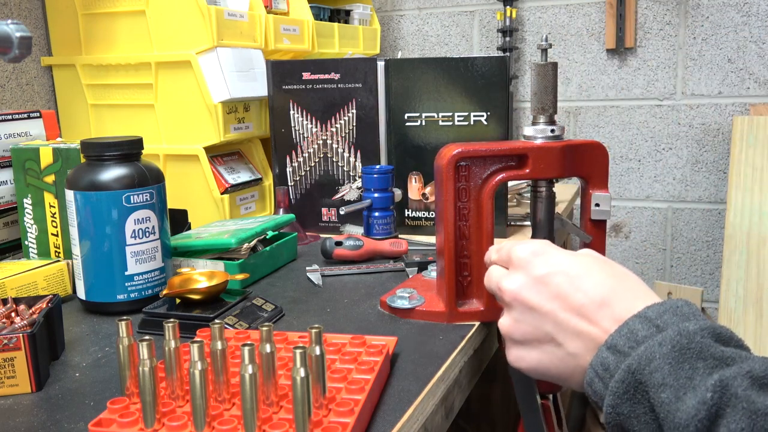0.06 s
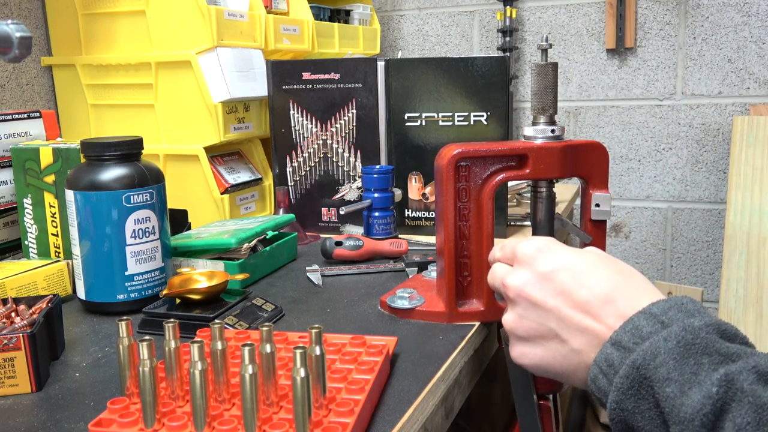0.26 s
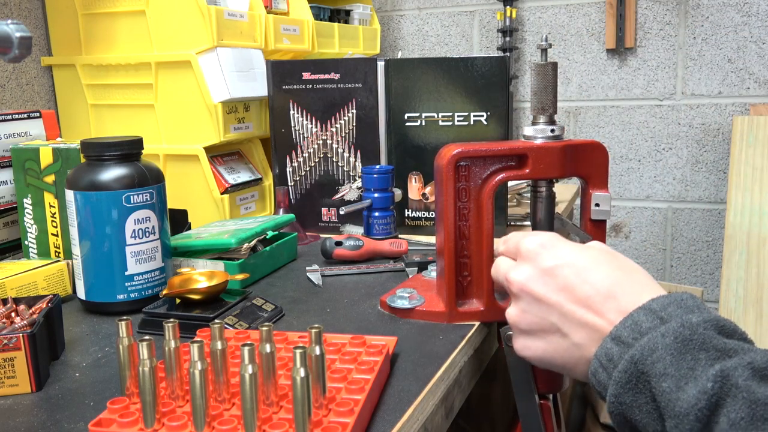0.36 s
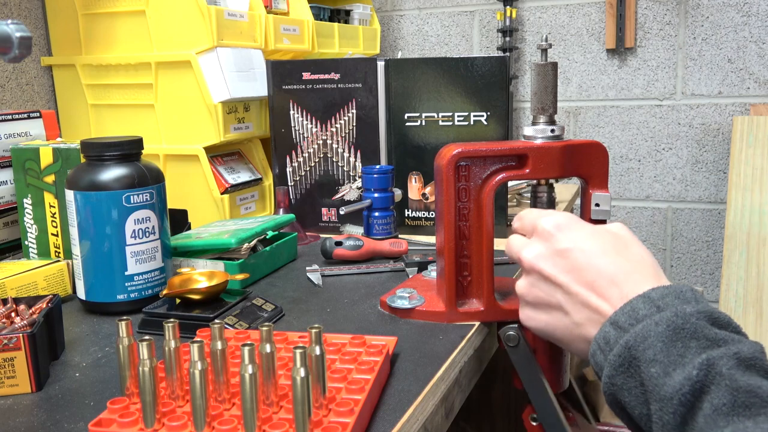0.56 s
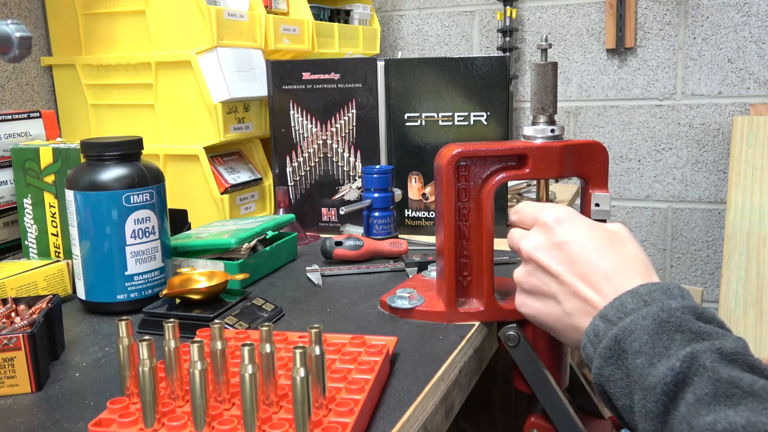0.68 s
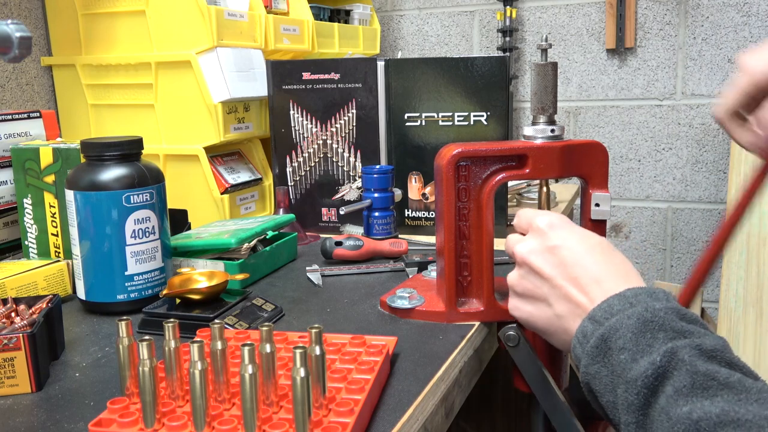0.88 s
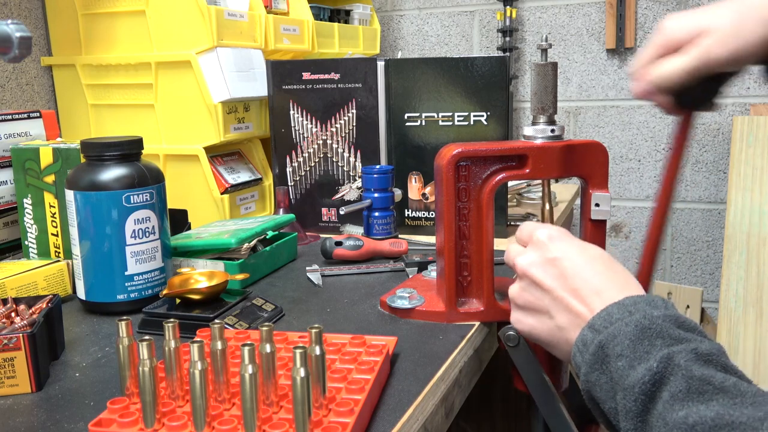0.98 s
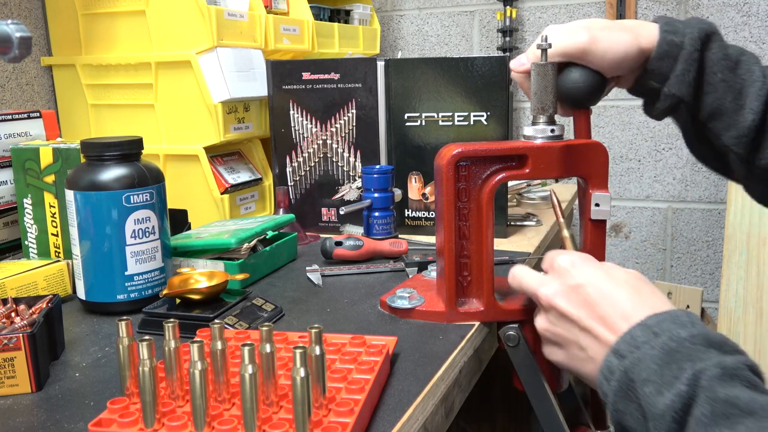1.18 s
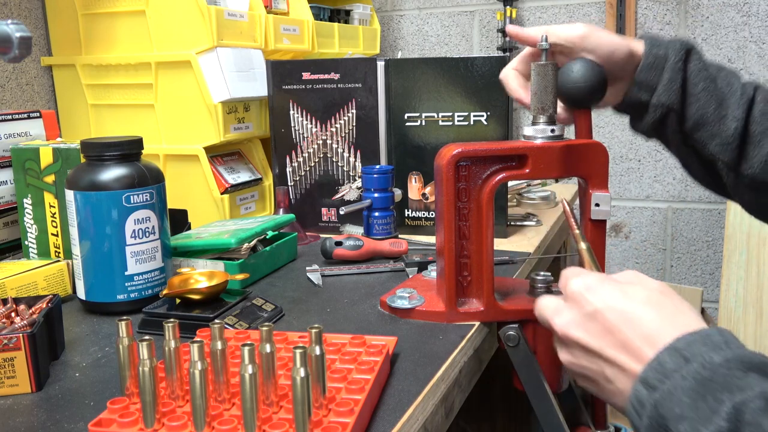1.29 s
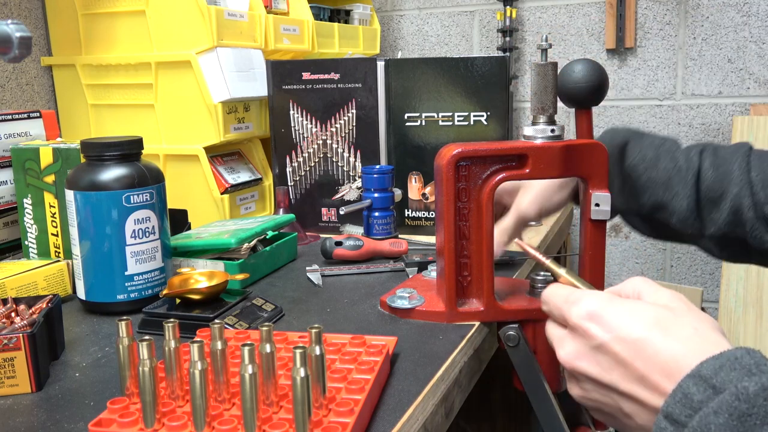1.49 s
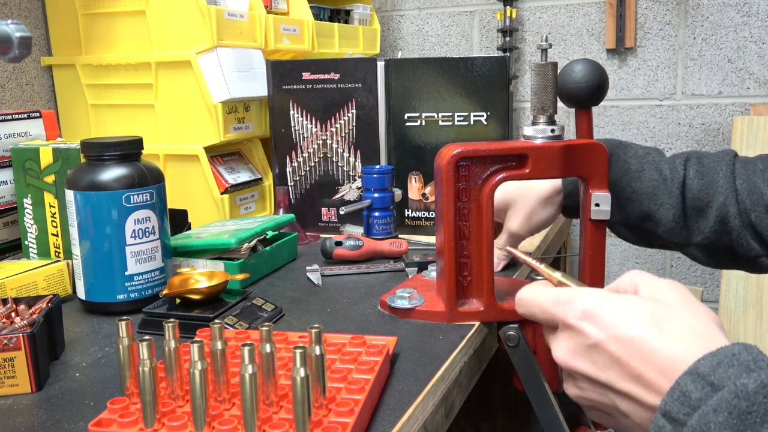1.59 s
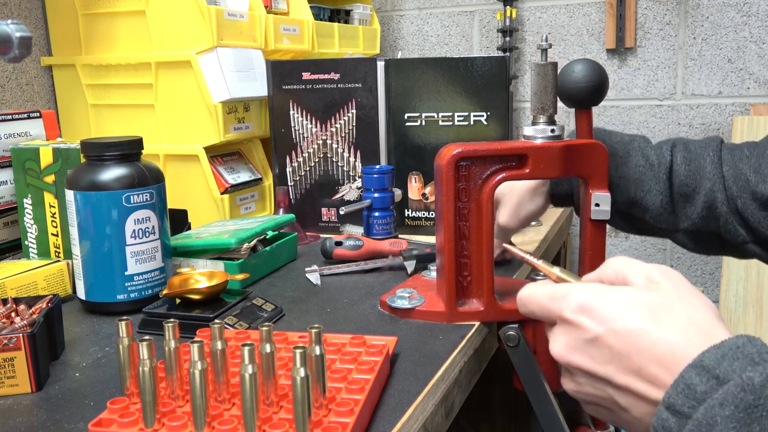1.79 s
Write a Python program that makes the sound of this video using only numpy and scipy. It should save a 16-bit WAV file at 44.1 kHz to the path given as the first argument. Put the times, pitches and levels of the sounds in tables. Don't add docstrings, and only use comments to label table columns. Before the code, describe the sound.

A cast-iron hand press thuds and clacks through its stroke, then brass cases rattle in a tray

```python
import sys
import numpy as np
from scipy import signal
from scipy.fft import rfft, irfft, next_fast_len
from scipy.io import wavfile
from scipy.ndimage import map_coordinates

SR = 44100
rng = np.random.default_rng(int(sys.argv[2]) if len(sys.argv) > 2 else 0)


def field_ratio(decibels):
    return 10 ** (np.asarray(decibels, dtype=float) / 20)


def store_wav(level_fs):
    pcm = np.round(np.clip(np.atleast_2d(level_fs), -1, 1) * 32767)
    wavfile.write(sys.argv[1], SR, pcm.T.astype(np.int16))


N = 81585
TICK_LAG_S = 0.0006


def unit(x):
    return x / np.sqrt(np.mean(x ** 2) + 1e-20)


def along(points, hz):
    f, v = np.transpose(points)
    return np.interp(np.log(hz + 1), np.log(f + 1), v)


def curve(rows):
    s, v = np.transpose(rows)
    return np.interp(np.arange(N) / SR, s, v)


def filtered(x, response):
    m = next_fast_len(x.shape[-1] + 8192)
    spectrum = rfft(x, m) * response(np.fft.rfftfreq(m, 1 / SR))
    return irfft(spectrum, m)[..., :x.shape[-1]]


def noise(tone, size=N):
    return unit(filtered(rng.standard_normal(size), lambda hz: field_ratio(along(tone, hz))))


def wander(count, position):
    return map_coordinates(rng.standard_normal(count), [position])


def peaks(rows):
    def response(f):
        total = 0
        for k, (c, w, db) in enumerate(rows):
            total = total + (-1) ** k * field_ratio(db) * 1j * f * w / (c * c - f * f + 1j * f * w)
        return total
    return response


def fade(t, t60):
    return field_ratio(-60 * t / max(t60, 1e-3))


def ring(modes, t):
    return sum(field_ratio(db) * fade(t, t60) * np.sin(2 * np.pi * hz * t) for hz, db, t60 in modes)


def add(out, s, x):
    part = out[round(s * SR):][:len(x)]
    part += x[:len(part)]


def strokes():
    # start/s, length/s, level/dB, centre/Hz, width/octaves
    stroke_rows = [
        (0, 0.23, -46, 543, 0.98),
        (0.439, 0.14, -45, 775, 1),
        (0.57, 0.11, -43.5, 370, 1.7),
        (0.69, 0.24, -55.5, 1290, 2.2),
        (0.925, 0.16, -40.5, 1120, 1.59),
        (1.032, 0.035, -44, 750, 0.44),
        (1.079, 0.08, -44, 920, 1.3),
        (1.239, 0.082, -40, 970, 1.12),
        (1.357, 0.061, -42, 466, 1.35),
        (1.567, 0.079, -57, 452, 1.5),
    ]
    # f/Hz, width/Hz, level/dB
    bore = [(230, 19, 13.5), (393, 29, 2), (486, 28, 4), (744, 270, -4), (915, 93, -0.5), (1170, 700, -6)]
    grain_db, grain_rate_hz, drift_db, drift_rate_hz, edge_s = 2.5, 220, 2, 25, 0.028
    out, t = np.zeros(N), np.arange(SR // 3) / SR
    for s, length, db, hz, width in stroke_rows:
        def colour(f):
            bell = field_ratio(-6 * (np.log2((f + 1) / hz) / width) ** 2)
            return bell * (0.38 + np.abs(peaks(bore)(f))) + field_ratio(-38.5) * (f > hz)
        roughness_db = grain_db * wander(1000, t * grain_rate_hz) + drift_db * wander(100, t * drift_rate_hz)
        grind = unit(field_ratio(roughness_db) * filtered(rng.standard_normal(len(t)), colour))
        since_start = t + (s < 0.01)
        gate = np.clip(np.minimum(since_start, length - t) / edge_s, 0, 1)
        add(out, s, field_ratio(db) * grind * gate)
    return out


def thuds():
    thud_times = [.2338, .609, 1.2018, 1.278, 1.380]
    # peak/dB, contact/s, boom/dB, brightness/dB per half octave
    thud_rows = [
        (-16, 0.0054, -21, -5),
        (-26.5, 0.0041, -32, -4),
        (-7.5, 0.0092, -17.5, -4),
        (-35, 0.0059, -24.5, -4),
        (-36.5, 0.0036, -37.5, -4.5),
    ]
    # f/Hz, level/dB, t60/s
    frame_down = [(279, -18, 0.058), (362.3, 6.5, 0.047), (459.7, -1, 0.088), (527, -7.5, 0.097),
                  (620, -7, 0.045), (804, -0.5, 0.058), (1075, -6.5, 0.049), (1400, -16.5, 0.032),
                  (1675, -15.5, 0.049)]
    # f/Hz, level/dB, t60/s
    frame_up = [(137, -8, .12), (211, -6, 0.13), (350, -6, 0.13), (385, 5, .045), (463, -8, 0.12),
                (618, -6, 0.075), (722, 7, 0.075), (918, -9, .09), (1000, -10, .09), (1362, -10, 0.055),
                (1730, -18, 0.05), (2008, -14, .05), (2400, -20, .04)]
    # f/Hz, level/dB, t60/s
    bench_top = [(62, 0.5, 0.19), (43.8, -5.5, 0.27), (130.6, -5, 0.18)]
    front_db, front_t60_s = -18.5, 0.036
    shudder_db, shudder_t60_s, shudder_rise_s = -15.5, 0.22, 0.00023
    front_tone = [(700, -30), (1500, -1), (3200, -2), (4500, -14), (9000, -22)]
    out, t = np.zeros(N), np.arange(SR // 3) / SR
    for s, (db, contact_s, boom_db, tilt_db) in zip(thud_times, thud_rows):
        push = 0.0029 * rng.standard_normal(len(t)) ** 3 * (t < contact_s) + (t == 0)
        modes = frame_down if s < 0.4 else frame_up
        swell = sum(ring([m], t) * np.minimum(t * m[0] / 2.03, 1) for m in modes)
        frame = signal.fftconvolve(push, swell)[:len(t)]
        frame = frame / np.abs(frame).max()

        shudder_tone = [(40, -40), (250, 0), (700, 0), (700 * 16, 8 * tilt_db)]
        shudder = noise(shudder_tone, size=len(t)) * fade(np.maximum(t - 0.5 * contact_s, 0), shudder_t60_s)
        shudder = shudder * field_ratio(0.66 * wander(100, t * 130)) * np.minimum(t / shudder_rise_s, 1)

        front = field_ratio(front_db) * noise(front_tone, size=len(t)) * fade(t, front_t60_s)
        boom = field_ratio(boom_db) * ring(bench_top, t) * np.minimum(t / contact_s, 1)
        add(out, s, field_ratio(db) * (frame + front + field_ratio(shudder_db) * shudder) + boom)
    return out


def knocks():
    # t/s, peak/dB, f/Hz, t60/s
    knock_rows = [(.277, -27, 390, 0.057), (.279, -32.5, 1100, 0.03), (.329, -38.5, 620, 0.035),
                  (.375, -42.5, 645, 0.033), (.462, -40.5, 546, 0.048), (.536, -40, 810, .03),
                  (.585, -29, 323, 0.02), (.593, -33, 670, 0.033), (.607, -35, 1500, .03),
                  (.618, -28, 720, .035), (0.6236, -38, 390, 0.024), (0.628, -29.5, 144, 0.18),
                  (.646, -35.5, 540, 0.057), (1.036, -39, 1150, .04), (1.0465, -28.5, 748, 0.035),
                  (1.055, -37, 720, 0.041), (1.097, -25, 824, 0.038), (1.2175, -11, 705, 0.042),
                  (1.220, -11.5, 451, 0.055), (1.236, -19.5, 225, 0.073), (1.265, -28, 329, 0.16),
                  (1.503, -48, 620, 0.055), (1.582, -45.5, 1180, 0.034), (1.581, -49.5, 1620, 0.059),
                  (1.624, -44.5, 550, .07), (1.689, -48, 1800, 0.061), (1.836, -50.5, 1700, .04)]
    rise_cycles = 1.05
    out, t = np.zeros(N), np.arange(SR // 5) / SR
    for s, db, hz, t60 in knock_rows:
        add(out, s, ring([(hz, db, t60)], t) * np.minimum(t * hz / rise_cycles, 1))
    return out


def pins():
    # t/s, peak/dB, tone/Hz, tone/dB, lift above 6 kHz/dB
    tick_rows = [(0.2332, -47, 3640, -10, 0), (0.5098, -33.5, 4430, -10, 0), (0.615, -31.5, 4840, -10, 0),
                 (0.6443, -25, 5130, -10, 0), (0.774, -42, 4050, -10, 0), (0.9375, -22, 4650, -3, -7),
                 (.9672, -32, 9100, 1, 0), (0.9688, -22, 3900, -25, -3), (0.9848, -32, 4170, -20, -2),
                 (.9867, -29, 3000, -14, -3), (1.0445, -21, 4400, -5, -2), (1.1952, -27, 4000, -20, -2),
                 (1.1976, -21, 4900, -5, 1), (1.2015, -21, 4100, -14, -4)]
    # t/s, peak/dB
    flick_rows = [(1.0028, -22.5), (1.0094, -40), (1.0294, -46), (1.3174, -46), (1.3253, -36),
                  (1.3484, -36), (1.3886, -44), (1.5008, -44)]
    # start/s, pinched/s, f/Hz, level/dB, t60/s
    pin_rows = [(.9385, .948, 7400, -39, .025), (.969, .987, 7327, -40, .3), (.987, 1.021, 7327, -39, 1.9),
                (1.021, 1.045, 7327, -53, .3), (.970, .988, 12490, -48, .6),
                (1.0455, 1.09, 12490, -37, .045), (.9685, .976, 9100, -38, .02),
                (.988, 1.028, 8942, -41, .07), (.989, 1.01, 9350, -43, .05),
                (.6445, .656, 12490, -37, .022), (.615, .625, 12900, -44, .025)]
    crack_t60_s, tone_t60_s, flick_t60_s, pinch_t60_s = 0.011, 0.008, 0.0053, 0.0031
    out, t = np.zeros(N), np.arange(SR // 5) / SR
    for s, db, hz, tone_db, top_db in tick_rows:
        crack_tone = [(1000, -5), (3500, -4), (7000, top_db - 3.5), (12000, top_db + 0.77), (16000, top_db - 18)]
        crack = 0.49 * noise(crack_tone, size=len(t)) * fade(t, crack_t60_s)
        tones = ring([(hz, tone_db, tone_t60_s), (0.99 * hz, tone_db - 16, tone_t60_s)], t)
        add(out, s + TICK_LAG_S, field_ratio(db) * (crack + tones))
    for s, db in flick_rows:
        speck = noise([(4000, -10.5), (11000, -6.5), (16000, -10.5)], size=len(t)) * fade(t, flick_t60_s)
        add(out, s + TICK_LAG_S, field_ratio(db - 5) * speck)
    for s, pinched, hz, db, t60 in pin_rows:
        damping = fade(np.maximum(t - pinched + s, 0), pinch_t60_s)
        add(out, s, ring([(hz, db, t60)], t) * damping)
    return out


def snaps():
    # t/s, peak/dB, case ring under it/dB
    snap_rows = [
        (1.0912, -2.5, -18),
        (1.1228, -38, -4),
    ]
    # f/Hz, level/dB, t60/s
    case_modes = [(3607, 0, .027), (904, -16, .06)]
    clip_hz, clip_t60_s, tail_db, tail_t60_s = 9970, 0.0034, -26.5, 0.053
    clip_modes = [(clip_hz, 0, clip_t60_s), (0.794 * clip_hz, -4, clip_t60_s), (1.192 * clip_hz, -5, clip_t60_s)]
    tail_tone = [(900, -22.5), (6000, -27.5), (9800, -27), (16000, -35)]
    out, t = np.zeros(N), np.arange(SR // 5) / SR
    for s, db, case_db in snap_rows:
        tail = noise(tail_tone, size=len(t)) * fade(t, tail_t60_s)
        blow = filtered(ring(clip_modes, t), lambda f: (1j * f / (1j * f + 2200)) ** 2)
        add(out, s, field_ratio(db) * (blow + field_ratio(tail_db) * tail + field_ratio(case_db) * ring(case_modes, t)))
    return out


def rattles():
    # t/s, peak/dB, t60/s, leading case/Hz
    rattle_rows = [(0.2474, -56, 0.02, 9000), (0.255, -31, 0.05, 10700), (0.2694, -36.5, 0.04, 10000),
                   (0.2795, -39, 0.033, 10000), (0.29, -44, 0.033, 10100), (0.3005, -47, 0.033, 6050),
                   (1.22, -24.5, 0.017, 13700), (1.2374, -40, 0.045, 14500), (1.252, -34, 0.065, 14400),
                   (1.264, -39, 0.05, 10000), (1.570, -46, .02, 12500), (1.573, -38, 0.022, 6640),
                   (1.5786, -29, 0.038, 10400), (1.584, -28.5, 0.022, 8100), (1.5855, -34, 0.04, 12800),
                   (1.594, -34, 0.033, 14900), (1.5973, -32, 0.04, 12800), (1.607, -40, .04, 9700),
                   (1.613, -44, 0.034, 12600), (1.626, -49, 0.056, 10000), (1.651, -40.5, 0.061, 12800),
                   (1.6613, -24, 0.037, 10400), (1.6736, -29, 0.025, 13100), (1.679, -40, 0.033, 12400),
                   (1.6891, -27.5, 0.035, 10150), (1.7, -32, 0.049, 12800), (1.7133, -35.5, 0.06, 10000),
                   (1.7251, -34.5, 0.04, 12800), (1.737, -50, .06, 9800), (1.8078, -36.5, 0.069, 6900),
                   (1.8357, -34, 0.062, 11700)]
    # f/Hz, width/Hz, level/dB
    tray_high = [(8190, 670, -6.5), (9410, 550, 1.5), (10660, 1400, 0), (11200, 770, -1.5),
                 (12800, 570, -2), (14200, 750, -6.5), (15100, 690, -4.5)]
    # f/Hz, width/Hz, level/dB
    tray_low = [(1760, 260, -15.5), (3850, 255, -9), (4900, 1800, -16), (5840, 910, -12), (6600, 230, -4)]
    handled_s, handled_low_db = 1.5, 4
    jolt_s, grain_db, grain_rate_hz = 0.003, 2, 1500
    vary_db, lead_width_hz, lead_db = 3.5, 300, 2
    out, t = np.zeros(N), np.arange(SR // 6) / SR
    for s, db, t60, lead_hz in rattle_rows:
        lumps = field_ratio(grain_db * wander(400, t * grain_rate_hz))
        decay = fade(np.maximum(t - jolt_s, 0), t60 * 0.84)
        burst = field_ratio(db - 3) * lumps * rng.standard_normal(len(t)) * decay
        low_lift_db = handled_low_db * (s > handled_s)
        modes = tray_high + [(hz, w, level + low_lift_db) for hz, w, level in tray_low]
        modes = [(hz, w, level + vary_db * rng.standard_normal()) for hz, w, level in modes]
        modes.append((lead_hz, lead_width_hz, lead_db))
        add(out, s + TICK_LAG_S, filtered(burst, peaks(modes)))
    return out


def brushes():
    # start/s, length/s, level/dB, lift above 9 kHz/dB
    brush_rows = [(0.462, 0.14, -58, -13.5), (0.59, 0.12, -54, -6), (0.732, 0.26, -62.5, 11),
                  (0.932, 0.49, -57.5, -2), (1.201, 0.22, -55.5, -1), (1.367, 0.091, -52.5, 12.5),
                  (1.566, 0.084, -51, -2.5), (1.652, 0.12, -54, -1)]
    out = np.zeros(N)
    for s, length, db, top_db in brush_rows:
        u = np.arange(SR // 4) / SR / length
        tone = [(1200, -20), (2500, -1.5), (6500, -9.5), (10000, top_db), (14500, top_db), (16000, top_db + 1)]
        specks = field_ratio(0.85 * np.repeat(rng.standard_normal(len(u)), 90)[:len(u)])
        swell = np.sqrt(np.sin(np.pi * np.minimum(u, 1)) + 1e-9) * (u < 1)
        add(out, s, field_ratio(db) * noise(tone, size=len(u)) * specks * swell)
    return out


def room(x):
    # f/Hz, t60/s
    wall_t60 = [(200, 0.5), (2000, 0.27), (10000, 0.089)]
    hz, t, z = signal.stft(rng.standard_normal(SR // 2), SR, nperseg=256)
    decay = field_ratio(-60 * t / along(wall_t60, hz)[:, None])
    tail = signal.istft(z * decay, SR, nperseg=256)[1]
    return signal.fftconvolve(np.pad(x, (150, 0)), tail / np.linalg.norm(tail))[:N]


def background():
    # t/s, level/dB
    sway_level = [(0, -44), (.3, -28.5), (.7, -30.5), (.85, -32), (1.0, -33), (1.17, -40), (1.44, -38.5),
                  (1.51, -21), (1.62, -39), (1.85, -40)]
    # f/Hz, level/dB per Hz
    sway_tone = [(2.4, -13), (4.0, 22.5), (16, 17), (66, -20), (97, -48), (120, -14.5), (160, -55),
                 (260, -120)]
    # f/Hz, level/dB per Hz
    hiss_tone = [(35, -14), (60, 6.5), (287, -5.5), (593, -10.5), (822, -18), (11500, -32.5), (16000, -26)]
    hiss_db = -52.5
    return field_ratio(hiss_db) * noise(hiss_tone) + field_ratio(curve(sway_level)) * noise(sway_tone)


def scene():
    room_db = -20.5
    hits = [thuds(), pins(), snaps(), rattles(), knocks()]
    echoed = sum(h + field_ratio(room_db) * room(h) for h in hits)
    return (echoed + strokes() + brushes() + background())[None]


def low_pass(x):
    return signal.sosfilt(signal.butter(12, 16890, fs=SR, output="sos"), x)


def record(dry):
    top_hz, over_hz, over_db = 15900, 16800, -28
    corners_hz = [top_hz - 600, top_hz + 200, over_hz - 300, over_hz]
    mix = filtered(dry, lambda hz: field_ratio(np.interp(hz, corners_hz, [0, over_db, over_db, -120])))
    return low_pass(np.clip(mix, -1, 1))


dry = scene()
out = record(dry)
store_wav(out)
```